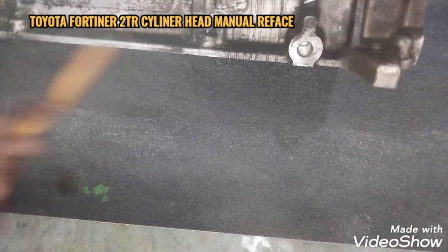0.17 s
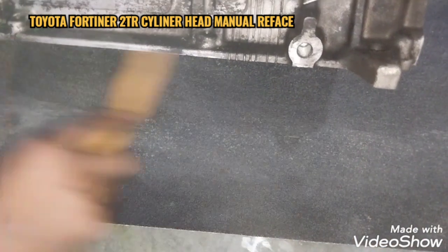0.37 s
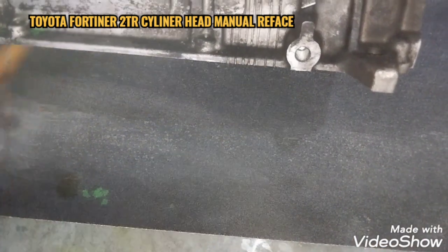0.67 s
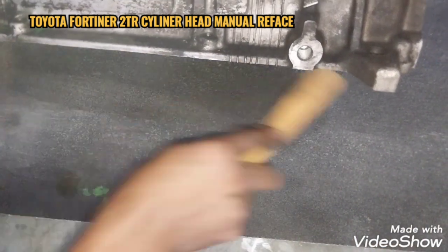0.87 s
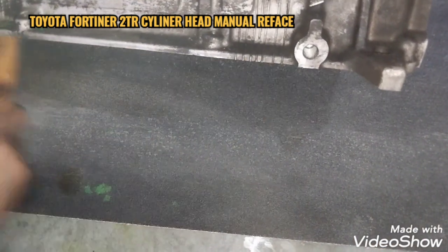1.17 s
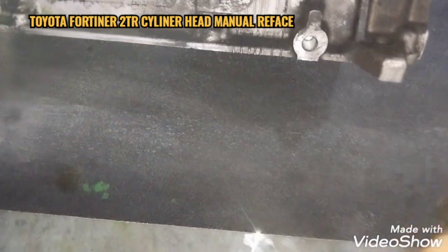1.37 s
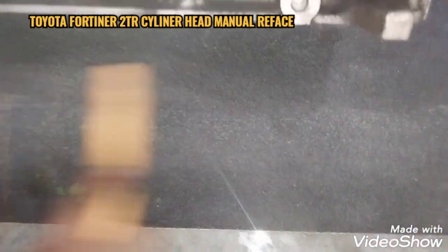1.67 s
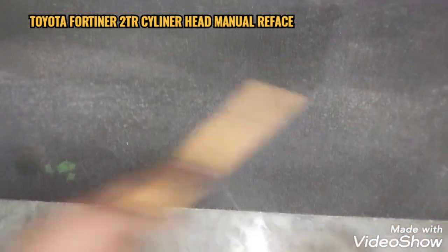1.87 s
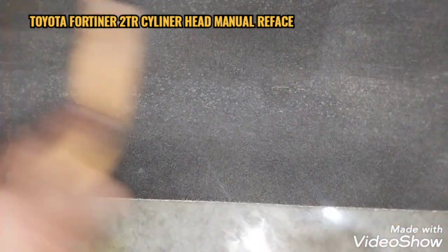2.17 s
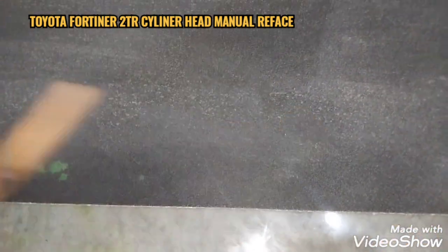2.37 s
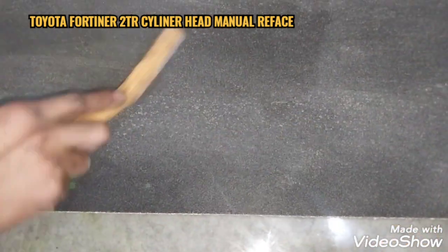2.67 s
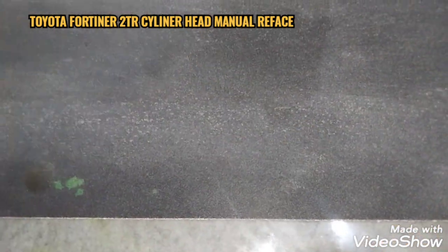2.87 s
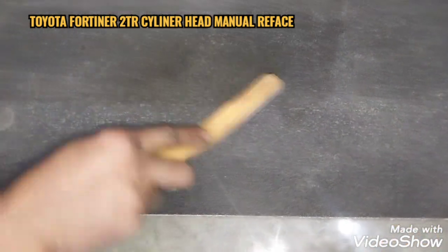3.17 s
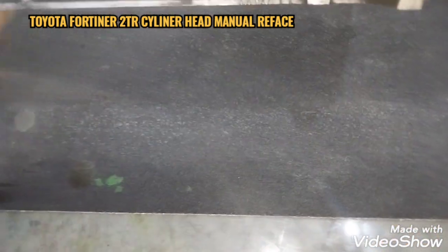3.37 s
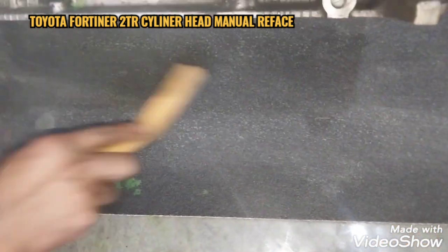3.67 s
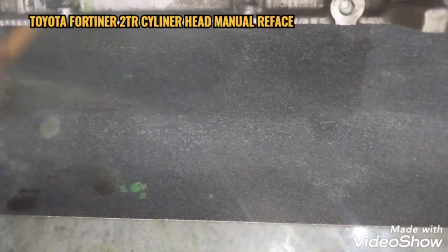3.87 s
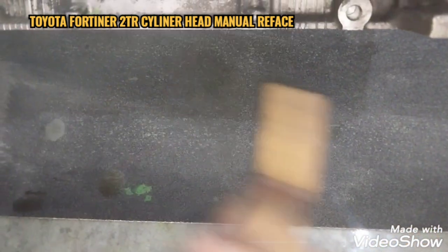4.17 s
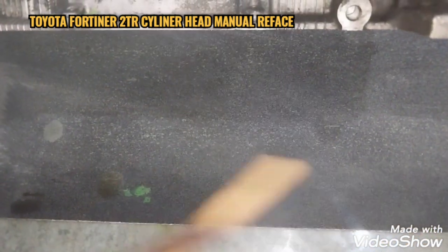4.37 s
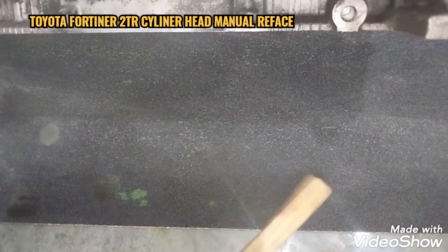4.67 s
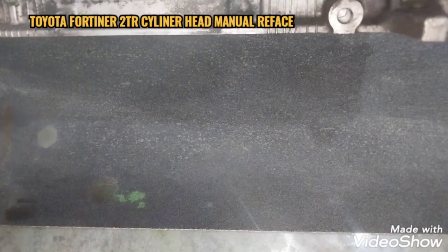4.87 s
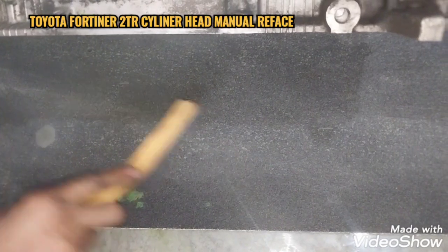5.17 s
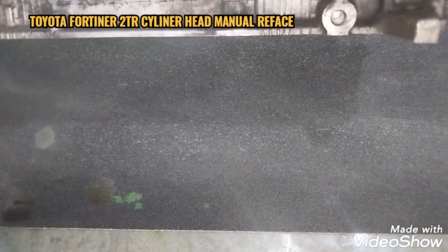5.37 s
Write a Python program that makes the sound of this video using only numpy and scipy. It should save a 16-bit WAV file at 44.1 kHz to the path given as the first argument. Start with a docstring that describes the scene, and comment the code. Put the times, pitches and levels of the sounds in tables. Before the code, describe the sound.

A hand brush sweeps over abrasive paper in quick, hissing, scratchy strokes, with light taps and a faint bench rumble.

```python
"""A hand brush sweeps metal dust off a sheet of abrasive paper on a workshop bench, stroke after stroke.
The bristles land with a tap, then rasp over the grit: thousands of tiny ticks a second blend into
a high fizz, a sharp bite and a lower growl. The hand jolts the bench, which rumbles underneath.
Elsewhere in the shop something knocks and a piece of metal rings, over a steady room noise."""
import sys
import numpy as np
from scipy import signal
from scipy.io import wavfile
from scipy.ndimage import uniform_filter1d, map_coordinates

SR = 44100
rng = np.random.default_rng(int(sys.argv[2]) if len(sys.argv) > 2 else 0)


def dump_mix(stems):
    """Bounce the given channels to the path in sys.argv[1] as a 16-bit WAV at rate SR."""
    frames = np.atleast_2d(stems).T  # one column per channel
    limited = np.clip(frames, -1, 1)  # hard clip at full scale
    pcm = np.round(limited * 32767).astype(np.int16)
    wavfile.write(sys.argv[1], SR, pcm)


N = 242550
T = np.arange(N) / SR

# the fizz of the bristle tips: (frequency [Hz], level [dB])
FIZZ_TONE = [(7000, -27), (8300, -12.5), (9200, -2.5), (11000, 1), (12500, 4), (14000, 0.5), (15500, -3.5),
             (16500, -68)]
SWING_S = 0.096  # a stroke ends this long after the brush lifts


def brush():
    """Bristles tick over the grit in three layers (fizz, bite, growl), uneven as tufts catch."""
    # sweeps of the brush: (start [s], rise [s], hold [s], top fizz level [dB], climb [dB], sag [dB],
    # bite over fizz at start [dB], at lift [dB], growl over fizz at start [dB], at lift [dB],
    # growl left minus right [dB], time from start to a brief growl swell or dip [s], its size [dB])
    strokes = [(0.097, 0.094, 0.11, -28, 14.7, 6.4, -6.5, -6.5, -13, -10, -1, .12, 3),
               (0.535, 0.11, 0.11, -27, 34, 5, -13, -6, -16, -9, -4, .2, 3),
               (0.967, 0.15, 0.069, -27, 32, 1.3, -10.5, -5.5, -16.5, -10, -4, .13, 3),
               (1.446, 0.14, 0.043, -22, 29.7, 2.4, -5, -5, -4.5, -16, 6, .15, -10),
               (1.847, .12, 0.11, -22, 39, 8.3, -4, -8, -18, -11.5, -2.5, .075, -3),
               (2.342, .1, 0.087, -22.5, 17, 6.8, -7, -8.5, -20, -13, -1.5, .055, -5),
               (2.706, 0.014, 0.025, -39.5, 16, 1, -3.5, -7.5, -15, -13, -2, .03, 1.5),
               (2.736, 0.11, 0.096, -27.5, 32, 5.4, -8.5, -5, -16, -7.5, -3, .155, 7),
               (3.239, 0.083, .15, -28, 26, 3.2, -8.5, -4.5, -12, -8, -4, .172, 5),
               (3.789, .1, 0.1, -26, 27, 8, -11, -5.5, -16, -12, -1, .125, 5),
               (4.378, 0.12, 0.032, -23.5, 20.6, 1.5, -6, -5.5, -6, -17, 1, .115, -7),
               (4.737, 0.0054, 0.023, -47, 6, 2, 1, -6, -12, -12, -2, .02, 1.5),
               (4.779, 0.071, 0.12, -23, 13.2, 6.6, -5.5, -9.5, -21.5, -12, 1, .058, -8),
               (5.237, 0.065, 0.12, -26.5, 29, 4.3, -8, -6.5, -14, -8, -2, .17, 3)]
    # the bite of bristles on grit: (frequency [Hz], level [dB])
    bite_tone = [(300, -19), (700, -41), (1500, -20.5), (2200, -15), (3000, -12.5), (3800, 2), (4500, 0),
                 (5300, 3), (6300, 0), (7500, 3), (8300, -2), (9500, -26.5)]
    # the growl of the paper itself: (frequency [Hz], level [dB])
    growl_tone = [(300, -36.5), (800, -19.5), (1700, -12), (2600, -8), (3300, 2.5), (3800, 9.5),
                  (4500, -17), (6500, -31.5)]
    fizz_gain, bite_gain, *growl_gains = sum(stroke_gains(*row) for row in strokes)
    travel = np.zeros(N)  # runs from 0 to 1 in each stroke
    for start, rise, hold, *_ in strokes:
        travel[T >= start] = ((T[T >= start] - start) / (rise + hold + SWING_S)).clip(0, 1)
    tufts = wobble((3, N), samples=200)
    tips = stereo(grit_ticks(per_s=13000, spread_db=-1.5), likeness=1.0)
    near, stray = grit_ticks(per_s=9000, spread_db=2.0)
    # the right microphone hears the brush travel past, an upside-down bounce and scattered sound
    moving = delay(near, ms=-0.2 + 0.57 * travel)
    bounce = -0.41 * delay(near, ms=0.635)
    rasp = np.array([near, unit_level(0.093 * moving + bounce + 2.35 * stray)])
    fizz = fizz_gain * mic_tones(gain(0.3 + 0.51 * tufts[0]) * unit_level(colour(tips, FIZZ_TONE)))
    bite = bite_gain * mic_tones(gain(3.5 + tufts[1]) * unit_level(colour(rasp, bite_tone)))
    growl = np.array(growl_gains) * gain(2.5 + 0.66 * tufts[2]) * unit_level(colour(rasp, growl_tone))
    return fizz + bite + growl


def stroke_gains(start, rise, hold, top_db, climb_db, sag_db, bite_db, lift_bite_db,
                 growl_db, lift_growl_db, pan_db, swell_s, swell_db):
    """Loudness of fizz, bite, left and right growl in one stroke: a quick climb, a sag, a fall."""
    touch_db_per_s, fall_db_per_s, ease_s = 1500, 308, 0.0087
    top, lift = start + rise, start + rise + hold
    touch = touch_db_per_s * (start - T).clip(0)
    climb = climb_db * ((top - T) / rise).clip(0, 1) ** 2.67
    sag = sag_db * ((T - top) / hold).clip(0, 1) ** 2
    fall = fall_db_per_s * ease_s * np.logaddexp(0, (T - lift) / ease_s)
    fizz = top_db - touch - climb - sag - fall
    arch = np.sin(np.pi * ((T - start) / (lift + SWING_S - start)).clip(0, 1)) ** 2
    swell = swell_db * np.exp(-((T - start - swell_s) / 0.03) ** 2)
    # the duller layers get part of the fall back, so they linger
    bite = fizz + np.interp(T, [start, lift], [bite_db, lift_bite_db]) + arch + 0.12 * fall
    growl = fizz + np.interp(T, [start, lift], [growl_db, lift_growl_db]) + swell + 0.073 * fall
    # the growl swings right at both ends of the stroke
    pan = pan_db + np.interp(T, [start, top, lift, lift + SWING_S], [-1.5, 0, -2, -13.5])
    return gain(np.maximum([fizz, bite, growl + pan / 2, growl - pan / 2], -200))


def grit_ticks(per_s, spread_db):
    """Two streams of ticks: bristles hit grains of unequal size at random moments."""
    size = gain(spread_db * np.minimum(rng.exponential(1, (2, N)), 5))
    sign = rng.choice([-1., 1.], (2, N))
    hits = rng.random((2, N)) < per_s / SR
    return unit_level(size * sign * hits)


def hand_shading(x, patch_db):
    """The moving hand and brush block and reflect sound, so bands of pitch swell and sink."""
    hz, _, spectrum = signal.stft(x, SR, nperseg=256, noverlap=192)
    patches = rng.standard_normal((3, spectrum.shape[2], len(hz))).transpose(0, 2, 1)
    patches = uniform_filter1d(patches, 3, axis=1)
    patches = unit_level(uniform_filter1d(uniform_filter1d(patches, 35), 35))
    apart = np.clip((9000 - hz) / 2000, 0, 1)[:, None]  # the top octave moves alike on both sides
    shade = apart * patches[:2] + (1 - apart) * patches[2]
    return signal.istft(spectrum * gain(patch_db * shade - 1.76), nperseg=256, noverlap=192)[1][:, :N]


def bristle_taps():
    """A tuft strikes the paper: a crisp tick rings a papery note, then late bristles scatter in a puff."""
    # bristles landing: (time [s], level [dB], paper pitch [Hz], fizz in the puff [dB],
    # left minus right [dB], rise [ms])
    landings = [(0.069, -31, 3620, -0.5, -4, 1), (0.0993, -29.5, 3820, -9, -9, 0.92),
                (1.395, -49.5, 2830, 15, -16, 1.1), (1.446, -33, 4660, -13, 0, 1.2),
                (1.8423, -22, 4200, -7, -4, 0.16), (2.314, -25.5, 3780, -17, -2, 1.4),
                (2.3416, -33, 5800, -4, 2, 1.2), (2.7065, -36, 6640, -5, 0, 2.5),
                (4.374, -29.5, 5500, -12, 6, 2.5), (4.735, -23, 3050, -8, -5, 0.56),
                (4.781, -24, 5900, -10, 3, .9), (4.989, -28, 1740, -14, -10.5, 2.2)]
    out = np.zeros((2, N))
    noise = rng.standard_normal((2, N))
    fizz = unit_level(colour(noise[0], FIZZ_TONE))
    t = T[:4000]
    for start, db, hz, fizz_db, pan_db, rise_ms in landings:
        at = slice(round(start * SR), round(start * SR) + len(t))
        note = sum(share * np.sin(2 * np.pi * ratio * hz * t)
                   for ratio, share in ((1, 0.54), (1.32, 0.22), (1.75, 0.23)))
        attack = (1 - np.exp(-1000 * t / rise_ms)) ** 2
        tick = 2.13 * note * attack * gain(-60 * t / (0.0063 + 0.005 * rise_ms))
        puff = unit_level(resonate(noise[:, at], hz, width=1600)) + gain(fizz_db) * fizz[at]
        shape = gain(-13.5) * burst(start, rise_ms / 1000, fade=0.02)
        shape += gain(-17) * burst(start, rise=0.0035, fade=0.16)
        out[:, at] += gain(db + np.array([[0.5], [-0.5]]) * pan_db) * (tick + puff * shape[at])
    return out


def bench_rumble():
    """Jolts and knocks ring the low notes of the bench; knocks add a clatter that lasts longer."""
    # the natural notes of the bench: (pitch [Hz], width [Hz], level [dB])
    bench_notes = [(112.5, 26, -4.5), (184.4, 55.5, 0), (250.7, 32, -2), (317.4, 52, 3), (397, 68, -3.5),
                   (580, 140, -7.5)]
    # the hand jolts the bench: (time [s], level [dB], share of the bench's upper three notes [dB],
    # lowest note's level [dB], rise [dB/s], hold [s], time to fade 60 dB [s])
    jolts = [(0.119, -32.5, -1.5, -47.5, 400, .04, .6), (0.625, -43, -3.5, -64, 200, .02, .6),
             (.69, -38.5, -1, -75, 250, 0.011, .5), (1.01, -44.5, -6.5, -57, 330, .11, .4),
             (1.146, -36, -5.5, -58, 600, 0.0068, .3), (1.225, -55, 1, -46, 200, 0.015, 0.2),
             (1.47, -53, -16, -48.5, 300, .07, 0.46), (1.846, -38.5, -8, -43, 400, .01, .25),
             (1.903, -41.5, -7, -42, 270, 0.032, 0.52), (2.255, -45, -4.5, -60, 202, 0.022, 0.9),
             (2.323, -43, -1, -68, 270, .01, .3), (2.455, -52, -3.5, -61, 150, .14, 0.43),
             (2.768, -40, -1, -56.5, 350, 0.11, 0.34), (2.952, -45, -2.5, -64, 150, .02, 0.26),
             (3.276, -42.5, -2, -54.5, 380, 0.19, .35), (3.974, -41.5, -1, -53, 298, .06, .4),
             (4.53, -42, -1.5, -76, 170, 0.045, 0.48), (4.763, -42, -6, -49.5, 500, 0.0059, 0.26),
             (4.808, -28, -9.5, -41.5, 700, 0.0089, 0.14), (4.895, -41, -4.5, -47, 300, .005, .35),
             (4.955, -43, -9, -52, 200, .005, .17), (5.21, -46.5, -1.5, -69, 330, .02, .5),
             (5.278, -38, -1.5, -70, 200, .005, 0.18), (5.41, -53.5, -2, -70, 100, .02, 0.44)]
    # dull knocks: (time [s], level [dB], clatter boost [dB], time for the thud to fade 60 dB [s])
    knocks = [(1.145, -29.5, 7.5, 0.12), (1.84, -39, -13, 0.1), (3.98, -32, -6.5, 0.2),
              (4.093, -28.5, 0, 0.12), (4.811, -28, -13, 0.11)]
    # the clatter of a knock: (frequency [Hz], level [dB])
    clatter_tone = [(200, -8), (400, 2), (800, 0.5), (1600, 1.5), (3600, -1.5), (5000, -12), (8000, -12.5),
                    (14000, -24)]
    noise = stereo(rng.standard_normal((2, N)), likeness=0.89)
    boom, *notes = (gain(db) * unit_level(resonate(resonate(noise, hz, width), hz, width))
                    for hz, width, db in bench_notes)
    times, _, upper_db, *_ = np.transpose(jolts)
    upper = np.clip(gain(np.interp(T, times, upper_db)), 0, 1)
    wood = np.sqrt(1 - upper ** 2) * unit_level(sum(notes[:2])) + upper * unit_level(sum(notes[2:]))
    clatter = unit_level(colour(stereo(rng.standard_normal((2, N)), likeness=0.08), clatter_tone))
    wood_gain = boom_gain = np.zeros(N)
    for time, db, _, boom_db, rise, hold, fade in jolts:
        wood_gain = np.maximum(wood_gain, jolt(time, db - 7, rise, hold, fade))
        boom_gain = np.maximum(boom_gain, jolt(time, boom_db, 0.77 * rise, hold, 0.91 * fade))
    out = wood * wood_gain + boom * boom_gain
    for time, db, clatter_db, fade in knocks:
        thud = 0.39 * wood * burst(time, 0.004, fade)
        rattle = gain(clatter_db - 7.5) * clatter * burst(time, 0.001, 1.93 * fade)
        out += gain(db + 1) * (thud + rattle)
    return out * gain([[-0.7], [0.7]])


def jolt(time, db, rise_db_per_s, hold, fade):
    """The shaking of the bench builds up until the given time, holds and dies away."""
    return gain(db - rise_db_per_s * (time - T).clip(0) - 60 * (T - time - hold).clip(0) / fade)


def metal_ring(start=4.095):
    """Struck metal some way off: its notes swell and waver as the echoes of the room arrive."""
    # the natural notes of the metal: (pitch [Hz], level [dB], time to fade 60 dB [s])
    metal_notes = [(1400, -37, 0.36), (1860, -9, 0.14), (2483, 4.5, 0.34), (2560, -5, 0.14),
                   (3120, -24, 0.52), (3930, -13.5, 0.31)]
    phases = rng.random(len(metal_notes))
    wavers = wobble((len(metal_notes), 2, N), samples=900)
    age = (T - start).clip(0)
    swell = (1 - np.exp(-age / 0.0081)) ** 2
    arrival = T - np.array([[0], [0.00008]])  # the right microphone is a little further away
    ring = sum(gain(db + 1.2 * waver - 60 * age / fade) * np.sin(2 * np.pi * (hz * arrival + phase))
               for (hz, db, fade), phase, waver in zip(metal_notes, phases, wavers))
    return gain([[-27.5], [-23]]) * swell * ring


def room_echo(x):
    """The room answers with a short wash of echoes, duller than the direct sound."""
    t = T[:SR // 2]
    tail = rng.standard_normal((2, len(t))) * gain(-60 * t / 0.2) * (t > 0.008)
    tail = colour(tail, [(1000, 4), (5000, -5.5), (12000, -11.5)])
    return signal.fftconvolve(x, tail / np.linalg.norm(tail[0]), axes=1)[:, :N]


def room_noise():
    """A soft, steady rush whose tone and level drift a little."""
    # the tone of the room noise: (frequency [Hz], level [dB])
    noise_tone = [(15, -45), (25, -22), (130, -5.5), (280, -8.5), (430, -5.5), (730, -5), (1060, -5.5),
                  (3130, -6.5), (4200, -9.5), (5000, -12), (8500, -20), (12400, -18.5), (15000, -26),
                  (16500, -34)]
    # how alike its left and right sides are: (frequency [Hz], likeness [0 to 1])
    side_likeness = [(60, 0.16), (150, 0.95), (380, 0.67), (950, 0.075), (2380, 0.011), (5980, 0.074),
                     (15000, 0.18)]
    # its slow drift: (time [s], level [dB])
    drift = [(0, -0.5), (1, 0), (2, -1), (2.7, -1), (3.2, -3), (3.7, -1.5), (4.3, -1.5), (5.1, -2.5),
             (5.5, -3.5)]
    frames, hz = N // 256 + 5, np.fft.rfftfreq(1024, 1 / SR)
    a, b, c, d, patches = rng.standard_normal((frames, 513, 5)).T
    patches = unit_level(uniform_filter1d(uniform_filter1d(patches, 12, 0), 14, 1))
    spectrum = stereo([a + 1j * b, c + 1j * d], look_up(side_likeness, hz)[:, None])
    spectrum *= gain(look_up(noise_tone, hz)[:, None] + 1.9 * patches)
    rush = unit_level(signal.istft(spectrum, nperseg=1024, noverlap=768)[1][:, :N])
    return gain([[-52], [-50]]) * gain(np.interp(T, *np.transpose(drift))) * rush


def mic_tones(x):
    """The two microphones each colour the sound in their own way."""
    # the balance between the microphones: (frequency [Hz], left minus right [dB])
    balance = [(1000, -7), (2000, 3.5), (4000, -4), (5200, 2), (6200, -2), (7200, -1.5), (8300, -10.5),
               (9600, 2), (11000, -7.5), (12400, -4.5), (14500, -1.5)]
    return np.array([colour(channel, [(hz, side * db / 2) for hz, db in balance])
                     for channel, side in zip(x, (1, -1))])


def gain(db):
    """Turns decibels into a factor to multiply by."""
    return 10 ** (np.asarray(db) / 20)


def unit_level(x):
    """Scales a signal to an average (rms) level of 1."""
    return x / np.sqrt(np.mean(x ** 2) + 1e-20)


def look_up(points, hz):
    """Reads between the rows of a (frequency, value) table, with octaves evenly spaced."""
    row_hz, value = np.transpose(points)
    return np.interp(np.log(hz + 1), np.log(row_hz + 1), value)


def colour(x, points):
    """Shapes the tone by a (frequency, dB) table; clicks keep their sharp start."""
    log_gain = np.log(gain(look_up(points, abs(np.fft.fftfreq(2048, 1 / SR)))))
    response = np.fft.ifft(np.exp(log_gain - 1j * signal.hilbert(log_gain).imag)).real
    response = response.reshape((1,) * (x.ndim - 1) + (-1,))
    return signal.oaconvolve(x, response, axes=-1)[..., :x.shape[-1]]


def resonate(x, hz, width):
    """Makes a signal ring at one pitch; a smaller width (Hz) rings longer."""
    decay = np.exp(-np.pi * width / SR)
    return 2 * signal.lfilter([1 - decay], [1, -decay * np.exp(2j * np.pi * hz / SR)], x).real


def burst(start, rise, fade):
    """A loudness curve that rises, then drops 60 dB every `fade` seconds."""
    age = (T - start).clip(0)
    return (1 - np.exp(-age / rise)) * gain(-60 * age / fade)


def wobble(shape, samples):
    """Smooth random curves; more samples make them slower."""
    return unit_level(uniform_filter1d(uniform_filter1d(rng.standard_normal(shape), samples), samples))


def stereo(pair, likeness):
    """Mixes two noises into left and right: likeness 0 is unrelated, 1 is identical."""
    return np.array([pair[0], likeness * pair[0] + np.sqrt(1 - likeness ** 2) * pair[1]])


def delay(x, ms):
    """Delays a signal by a time that may change as it plays."""
    return map_coordinates(x, [np.arange(N) - ms * SR / 1000], order=3)


def scene():
    """The brush and its echo, then the bench, the metal and the room noise."""
    sweeping = hand_shading(brush(), patch_db=2.5) + bristle_taps()
    return sweeping + gain(-12) * room_echo(sweeping) + bench_rumble() + metal_ring() + room_noise()


def record(dry):
    """Small microphones lose the deep bass, and the recorder cuts the highest treble."""
    bass_cut_hz, treble_cut_hz = 45, 16150
    thin = signal.sosfilt(signal.butter(2, bass_cut_hz, "high", fs=SR, output="sos"), dry)
    treble_cut = signal.firwin(511, treble_cut_hz, window=("kaiser", 9), fs=SR)
    return signal.oaconvolve(thin, treble_cut[None], "same")


dry = scene()
out = record(dry)
dump_mix(out)
```